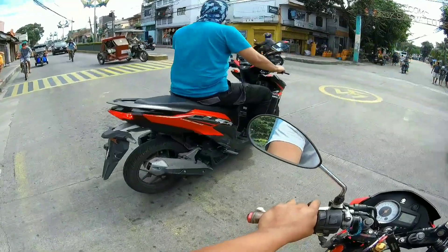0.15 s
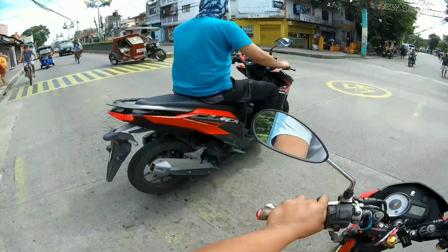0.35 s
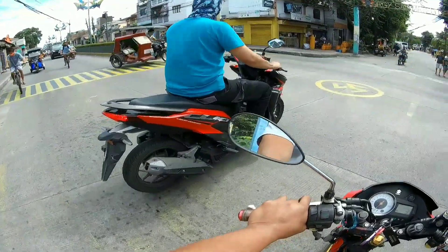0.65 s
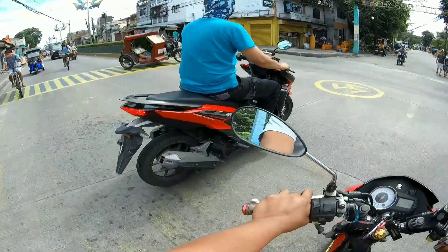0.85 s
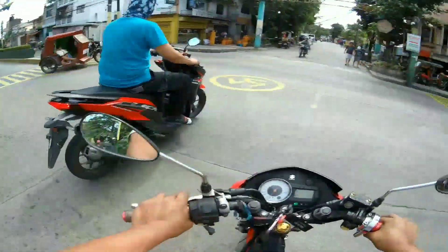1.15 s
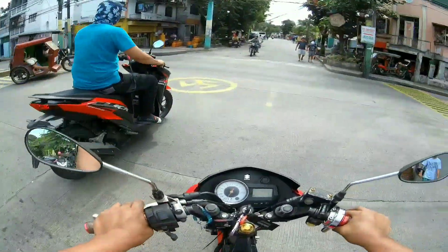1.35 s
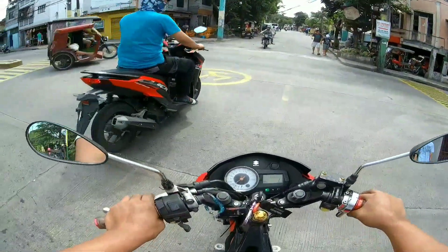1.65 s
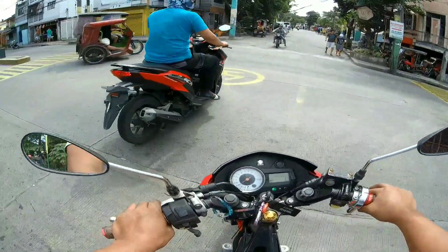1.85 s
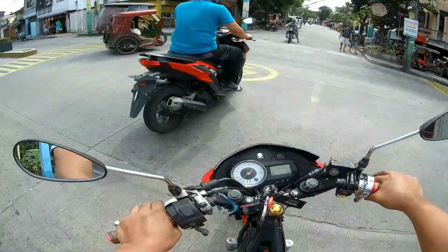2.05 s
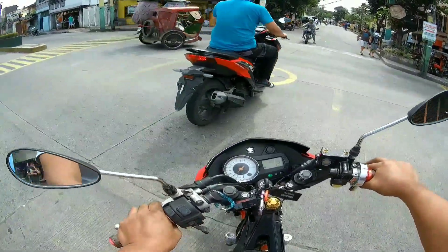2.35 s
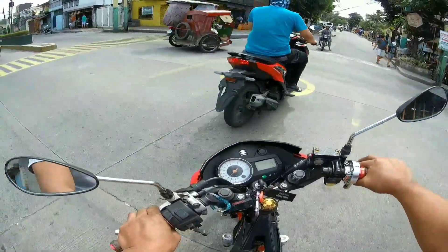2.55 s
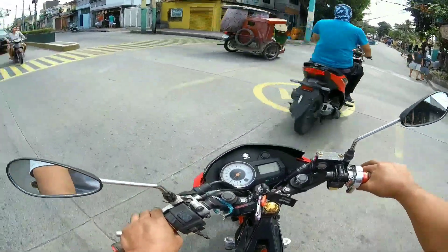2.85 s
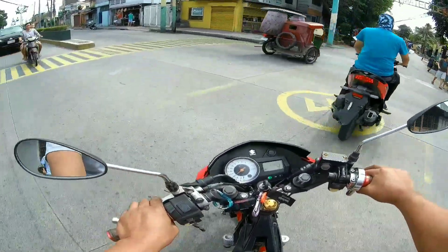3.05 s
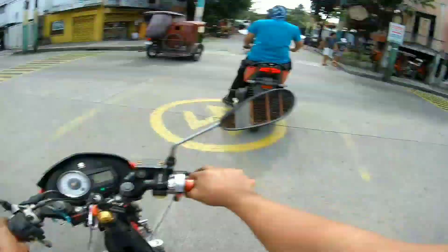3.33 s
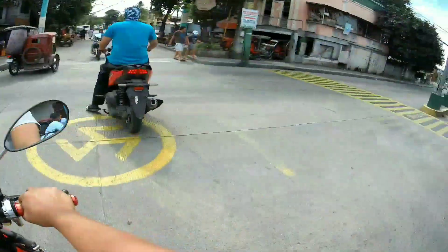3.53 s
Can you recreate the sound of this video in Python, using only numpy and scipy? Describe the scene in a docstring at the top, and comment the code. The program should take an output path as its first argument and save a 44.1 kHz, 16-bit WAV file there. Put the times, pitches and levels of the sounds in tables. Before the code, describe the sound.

A small motorcycle heard from the rider's seat idles slowly amid heavy low wind buffets and a nearby scooter's ticking, then quickens into hard, steady putting over a soft wash of street traffic.

```python
"""A single-cylinder motorcycle idles at a crossing, then pulls away at a steady putt, heard from the rider's seat.
Each firing is one pressure puff echoing in the exhaust and ringing the muffler shell; shaped noise gives
the valve hiss, rasp, idle burble and intake gulp. A scooter alongside ticks in short fuzzy rings;
wind, as low noise, buffets the microphone over a noise wash of street traffic."""
import sys
import numpy as np
from scipy import signal
from scipy.fft import irfft
from scipy.io import wavfile
from scipy.ndimage import uniform_filter1d

SR = 44100
rng = np.random.default_rng(int(sys.argv[2]) if len(sys.argv) > 2 else 0)


def makeup_ratio(level_db):
    """Linear amplitude ratio for a level in decibels (20 dB per factor of ten)."""
    decades = np.asarray(level_db, float) / 20
    return 10 ** decades


def generate_wav(signal):
    """Clip the signal to [-1, 1] and save it as 16-bit WAV at the path in sys.argv[1]."""
    frames = np.transpose(np.atleast_2d(signal))
    scaled = np.clip(frames, -1, 1) * 32767
    pcm = np.round(scaled).astype(np.int16)
    wavfile.write(sys.argv[1], SR, pcm)


N = 162729
T = np.arange(N) / SR

# Engine state: t/s, puff level/dB, gas heat (0 cold to 1 hot), shell ring level/dB,
# valve hiss level/dB, intake level/dB
THROTTLE = [(0, 1, 0.27, -20, -41, -22), (.2, -6.5, 0.04, -51, -73, -30.5), (.4, -7.5, 0, -55, -75, -32.5),
            (.5, -15.5, 0, -60, -79, -37), (.8, -8.5, 0, -78, -70, -38), (.95, -11, 0, -38, -48, -32.5),
            (1.02, -19, 0, -51, -60, -33.5), (1.12, -8.5, 0.02, -31, -51, -34),
            (1.22, -3, 0.16, -30, -41, -20.5), (1.3, -1.5, 0.25, -21.5, -46, -19),
            (1.4, -1.5, 0.68, -18.5, -44.5, -38), (1.55, -2, 0.88, -18, -45.5, -43),
            (1.8, -3, 0.91, -19.5, -47, -56), (2.0, -3, 0.9, -20.5, -50.5, -52),
            (2.25, -5.5, 0.89, -21.5, -53, -49), (2.56, -4.5, 0.65, -22.5, -53, -61),
            (2.65, -4, 0.79, -19, -46, -39), (3.0, -6, 0.88, -20, -46, -69),
            (3.35, -5, 0.82, -19.5, -48.5, -38), (3.5, -6, 1, -17, -46.5, -56),
            (3.69, -7, 0.83, -17.5, -42.5, -49)]


def curve(table, axis=1):
    """Linear interpolation of one table column over time."""
    return np.interp(T, *np.array(table)[:, [0, axis]].T)


def noise(spectrum, patchy_db, size=512, band_hz=(0, SR), patch_bins=6):
    """Filtered Gaussian noise: random short-time spectra with drifting patches, rms 1 inside band_hz."""
    hz = np.fft.rfftfreq(size, 1 / SR)
    f, db = np.transpose(spectrum)
    a, b, patch = rng.standard_normal((4 * N // size + 5, len(hz), 3)).T
    patch = uniform_filter1d(patch, size=patch_bins, axis=0)
    patch = uniform_filter1d(patch, size=12, axis=1)
    spectrum_db = np.interp(np.log(hz + 1), np.log(f), db)[:, None]
    z = (a + 1j * b) * makeup_ratio(spectrum_db + patchy_db * patch / patch.std())
    x = signal.istft(z, nperseg=size, noverlap=3 * size // 4)[1][:N]
    power = (abs(z) ** 2).sum(1)
    in_band = (hz >= band_hz[0]) & (hz <= band_hz[1])
    return x / x.std() * np.sqrt(power.sum() / power[in_band].sum())


def gate(turns, at, half):
    """Periodic amplitude modulation: a soft window once in each engine cycle, at and half in cycles."""
    return np.exp(-(((turns - at + .5) % 1 - .5) / half) ** 4)


def street():
    """Superposition of many incoherent sources: other engines and tyres blend into filtered noise."""
    # Traffic spectrum: f/Hz, relative level/dB
    traffic_bands = [(40, -22), (70, -15), (110, 16), (200, 13), (260, 11), (350, 12), (540, -1),
                     (750, 1.5), (1050, 7), (1400, -4.5), (2160, -7.5), (3050, -14.5), (5300, -21),
                     (8000, -24.5), (8800, -31.5), (10400, -28.5), (11500, -34), (14000, -43), (15200, -54)]
    # Traffic level as recorded, ducked by the recorder's gain while wind is loud (the dips are tabulated):
    # t/s, level/dB in the 1.5-4 kHz band before the 2.5 dB lift below
    ducked_traffic = [(0.0, -38.5), (0.2, -44), (0.46, -50), (0.63, -51), (0.735, -53), (0.77, -44),
                      (0.84, -46.5), (0.95, -47.5), (1.1, -43.5), (1.24, -42), (1.45, -47), (1.76, -45.5),
                      (2.5, -48), (3.29, -49.5), (3.5, -46.5), (3.69, -45)]
    wash = noise(traffic_bands, patchy_db=1.5, size=1024, band_hz=(1500, 4000))
    return makeup_ratio(curve(ducked_traffic) + 2.5) * wash


def wind():
    """Low-frequency wind buffeting: noise, evened by its own smoothed power, follows the gusts closely."""
    # Wind spectrum: f/Hz, relative level/dB
    wind_bands = [(15, -24), (24, -3), (33, 2), (42, 1.5), (55, -9.5), (70, 0.5), (90, -7.5), (120, -18.5),
                  (170, -23), (250, -30), (800, -86)]
    # Gusts: t/s, level/dB before the 1.9 dB lift below
    gusts = [(0.0, -36), (0.04, -19), (0.07, -17.5), (0.09, -15.5), (0.16, -14), (0.18, -18), (0.21, -8.5),
             (0.27, -17), (0.33, -9.5), (0.36, -13.5), (0.44, -13), (0.49, -5), (0.52, -28), (0.56, -10),
             (0.68, -11), (0.71, -14.5), (0.73, -23), (0.76, -24), (0.8, -38), (0.85, -9), (0.88, -10.5),
             (0.93, -15), (0.97, -38), (1.05, -46), (1.09, -35), (1.29, -23), (1.32, -27), (1.53, -53),
             (1.76, -43), (1.89, -20.5), (1.93, -22.5), (1.99, -17), (2.16, -25), (2.19, -14.5),
             (2.33, -24.5), (2.44, -17.5), (2.47, -21.5), (2.6, -23), (2.62, -40), (2.65, -18), (2.72, -30),
             (2.78, -28), (2.9, -42), (2.97, -31), (3.0, -42), (3.32, -27.5), (3.36, -48), (3.38, -32),
             (3.47, -44), (3.49, -25), (3.58, -38), (3.69, -25.5)]
    x = noise(wind_bands, patchy_db=3, size=2048, patch_bins=2)
    power = uniform_filter1d(uniform_filter1d(x ** 2, size=1500), size=1500)
    x = x / (power + .1) ** .4
    return makeup_ratio(curve(gusts) + 1.9) * x / x.std()


def scooter():
    """Impulsively excited, damped resonance: a wide snap, a fuzzy ring with an overtone, a weaker rebound."""
    # Ticks: t/s, nominal peak level/dB, ring f/Hz
    ticks = [(0.0403, -30, 10130), (0.0946, -17, 9850), (0.152, -24, 9900), (0.2084, -22, 10000),
             (0.2636, -20.5, 9560), (0.319, -11, 10440), (0.375, -13, 10000), (0.4302, -27.5, 10100),
             (0.485, -27, 9600), (0.539, -25, 10100), (0.5945, -32, 9700), (0.6479, -28, 9900),
             (0.702, -30, 10500), (0.7562, -24.5, 9800), (0.8086, -25.5, 9940), (0.8609, -30, 10200),
             (0.9133, -28, 10100), (0.965, -33, 10200), (1.016, -26, 10000), (1.068, -26, 10100),
             (1.118, -24, 10100), (1.169, -21.5, 10300), (1.226, -28, 10400), (1.273, -30, 9800),
             (1.3668, -45, 9900), (1.4192, -40, 10300), (1.4646, -38, 10200), (1.7086, -31.5, 10300),
             (1.7559, -32, 10300), (1.8033, -35, 10300), (1.8447, -36, 10300), (1.8906, -35, 10500),
             (2.2959, -37, 10700), (2.4199, -37.5, 10200), (2.4698, -44, 9850), (2.5157, -36, 9430),
             (2.5626, -33, 9500), (2.609, -26.5, 10300)]
    t60_s, rise_s, rebound_s, rebound_db = .019, .0018, .0075, -14
    pole_width_hz, overtone_ratio, overtone_db, snap_db = 1300, 1.42, -19, -13
    out, t = np.zeros(N), T[:2048]
    fall = makeup_ratio(-60 * t / t60_s) * np.sin(np.pi / 2 * np.minimum(t / rise_s, 1)) ** 2
    lag = int(rebound_s * SR)
    shape = fall + makeup_ratio(rebound_db) * np.r_[np.zeros(lag), fall[:-lag]]
    poles = np.poly([np.exp(-np.pi * pole_width_hz / SR)] * 3)
    draws = rng.standard_normal((len(ticks), 3, 2048))
    for (s, db, hz), (a, b, c) in zip(ticks, draws):
        fuzz = signal.lfilter([1], poles, a + 1j * b)
        fuzz = (0.14 + fuzz / fuzz.std()) * 0.66  # a little steady tone among the noise
        tone = np.exp(2j * np.pi * hz * t)
        overtone = makeup_ratio(overtone_db) * np.exp(2j * np.pi * overtone_ratio * hz * t)
        ring = (fuzz * (tone + overtone)).real
        snap = makeup_ratio(snap_db) * uniform_filter1d(c, size=2) * fall ** 2
        out[round(s * SR):][:2048] += makeup_ratio(db) * (ring * shape + snap)
    return out


def intake(turns):
    """Intake flow noise: turbulence modulated once a cycle, a gulp before the next firing."""
    # Intake spectrum: f/Hz, relative level/dB
    intake_bands = [(500, -1), (900, -1), (1100, 13.5), (1400, 2), (1700, -10), (3000, -13.5), (6000, -26),
                    (9000, -52), (15000, -80)]
    gulp = gate(turns, at=.82, half=.15) * noise(intake_bands, patchy_db=3, size=256)
    return makeup_ratio(curve(THROTTLE, axis=5)) * gulp


def burble(turns):
    """Low-speed flow noise: slow gas leaves the cold pipe after each firing, fading as the gas heats."""
    # Burble spectrum: f/Hz, relative level/dB
    burble_bands = [(100, -20), (175, 6), (245, -11), (310, -1.5), (510, -2), (570, -46), (900, -57)]
    cold = np.clip(1 - curve(THROTTLE, axis=2), 0, 1) ** 2
    flow = gate(turns, at=.2, half=.18) * noise(burble_bands, patchy_db=-1, size=1024)
    return cold * makeup_ratio(curve(THROTTLE) - 17) * flow  # 17 dB under the puff column


def rasp(turns):
    """Gated band noise: a short rasp after each firing rises and falls with the shell ring."""
    # Rasp spectrum: f/Hz, relative level/dB
    rasp_bands = [(1200, -19), (1600, -12), (1880, 10), (2150, 16.5), (2580, 4.5), (2850, 5), (4500, -13),
                  (9000, -25)]
    burst = gate(turns, at=.25, half=.035) * noise(rasp_bands, patchy_db=5.0, size=256)
    return makeup_ratio(curve(THROTTLE, axis=3) - 22) * burst  # 22 dB under the shell ring column


def valve_hiss(turns):
    """Jet noise: gas hisses past the exhaust valve once after each firing."""
    # Hiss spectrum: f/Hz, relative level/dB
    hiss_bands = [(3000, -14), (4200, -28), (4750, -2), (5300, -4), (6300, -8), (7000, -1.5), (7500, 4),
                  (8200, -3), (8700, -9), (10300, -5), (11600, -11), (12800, -7), (14000, -4), (15200, -21)]
    jet = gate(turns, at=.38, half=.22) * noise(hiss_bands, patchy_db=2.5, size=256)
    return makeup_ratio(curve(THROTTLE, axis=4)) * jet


def delay(hz, ms, slow):
    """Propagation delay as a linear phase, stretched by the slowness of sound in the gas."""
    return np.exp(-2j * np.pi * hz * slow * ms / 1000)


def muffler_shell(hz, slow):
    """Modal synthesis: each puff strikes damped shell modes, unevenly in level and pitch."""
    # Muffler modes: f/Hz and width/Hz at unit pace, relative level/dB, nominal start after the puff/ms
    shell_modes = [(202.4, 7.1, -9.5, 1.36), (490, 85, -14, 3.6), (871, 28, -18.5, 0.57),
                   (848.7, 54, 6, 4.9), (959, 38, 0, 5.19), (1202, 66, -1, 5.03), (1863, 83, -5.5, 12),
                   (2534, 50, -9, 8.5)]
    uneven_db, uneven_pitch, soft_hz = 1.1, .005, 2100
    s, w = 2j * np.pi * hz, 2 * np.pi
    luck = rng.standard_normal((len(shell_modes), 2, len(slow), 1))
    shell = 0
    for (f, width, db, ms), (strike, detune) in zip(shell_modes, luck):
        pace = slow * (1 + uneven_pitch * detune)
        mode = w * f * SR / ((s * pace + np.pi * width) ** 2 + (w * f) ** 2)
        shell = shell + delay(hz, ms, slow) * makeup_ratio(db + uneven_db * strike) * mode
    return shell * np.exp(-(hz / soft_hz) ** 2)  # a soft strike


def exhaust_pipe(hz, heat, slow):
    """Waveguide resonance: a Gaussian puff recirculates in the pipe sections, duller in cold gas."""
    # Exhaust sections: nominal round trip/ms, share sent back cold, share sent back hot
    pipe_loops = [(2.26, 0.49, 0.68), (5.45, 0.34, 0.48), (8.38, 0.12, .3)]
    outlet_hz, outlet_width_hz, leak_hz, loss_hz = 94.3, 11, 26, 6000
    baffle_ms, lead_ms, lead = 6.217, 1.03, .23
    s, w = 2j * np.pi * hz, 2 * np.pi

    def mix(cold, hot):
        return cold + (hot - cold) * heat

    edge = mix(537, 692)  # Hz, corner of the puff spectrum
    puff = -np.exp(-(hz / edge) ** 2) * SR / (np.sqrt(np.pi) * edge)
    baffle = mix(0.77, 0.54) * delay(hz, baffle_ms, slow)
    kick = lead / delay(hz, lead_ms, slow)  # the shell kicks outward just before the puff leaves
    z = puff * (1 + baffle - kick)
    z *= s / (s + w * leak_hz)
    z *= s * s / (s * s + w * outlet_width_hz * s + (w * outlet_hz) ** 2)
    for ms, cold, hot in pipe_loops:
        z /= 1 - mix(cold, hot) * delay(hz, ms, slow) / (1 + (hz / loss_hz) ** 2)
    return z


def exhaust(turns):
    """Superposition of impulse responses: every firing adds one puff's pipe echoes and shell ring."""
    size, uneven_heat, uneven_db = 8192, .07, 1.1
    at = np.flatnonzero(np.diff(np.floor(turns)))  # a firing at each whole cycle
    luck = rng.standard_normal((2, len(at), 1))
    heat = curve(THROTTLE, axis=2)[at, None] + uneven_heat * luck[0]
    slow = 1.11 + (0.98 - 1.11) * heat  # travel-time factor, from cold to hot gas
    hz = np.fft.rfftfreq(size, 1 / SR)
    z = makeup_ratio(curve(THROTTLE)[at, None]) * exhaust_pipe(hz, heat, slow)
    z = z + makeup_ratio(curve(THROTTLE, axis=3)[at, None]) * muffler_shell(hz, slow)
    putts = irfft(z * makeup_ratio(uneven_db * luck[1]), size)
    before = size // 16  # room for the sound that precedes the puff
    putts = np.roll(putts, before, axis=1)
    out = np.zeros(N + 2 * size)
    for start, putt in zip(at, putts):
        out[start:start + size] += putt
    return out[before:][:N]


def scene():
    """Linear superposition of all sources, the engine phase being the integral of its firing rate."""
    # Engine speed: t/s, firing rate/(firings per s)
    firing_rate = [(0, 11.716), (0.25, 11.168), (0.5, 10.806), (0.75, 11.627), (0.9, 11.685), (1.06, 9.655),
                   (1.17, 9.787), (1.3, 15.962), (1.5, 23.259), (1.65, 23.655), (1.78, 24.315),
                   (1.9, 23.537), (2.2, 23.26), (2.38, 23.364), (2.56, 22.583), (2.75, 23.704),
                   (3.05, 23.259), (3.25, 23.964), (3.42, 24.107), (3.55, 24.969), (3.69, 25.287)]
    turns = np.cumsum(curve(firing_rate)) / SR - .497  # the first firing comes .497 cycle in
    engine = exhaust(turns) + valve_hiss(turns) + rasp(turns) + burble(turns) + intake(turns)
    return (engine + scooter() + wind() + street())[None]


def band_limit(x):
    """A steep low-pass at the top of the band."""
    return signal.sosfilt(signal.butter(12, 15170, fs=SR, output="sos"), x)


def record(dry):
    """Saturation and band limiting: soft overload, then the top of the microphone's range."""
    soft = .9 * np.tanh(dry / .9)
    lowpass = signal.butter(8, 14600, fs=SR, output="sos")  # Hz
    mix = signal.sosfilt(lowpass, soft)
    return band_limit(mix)


dry = scene()
out = record(dry)
generate_wav(out)
```